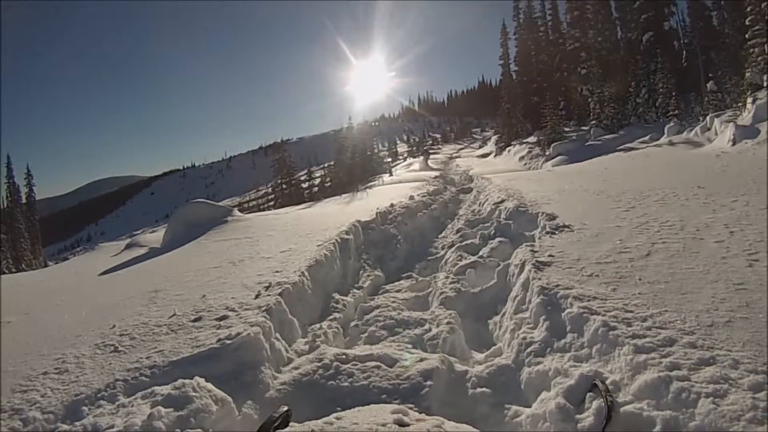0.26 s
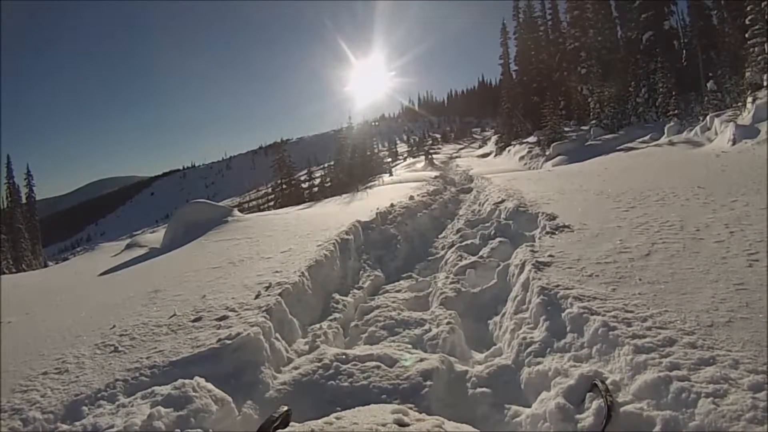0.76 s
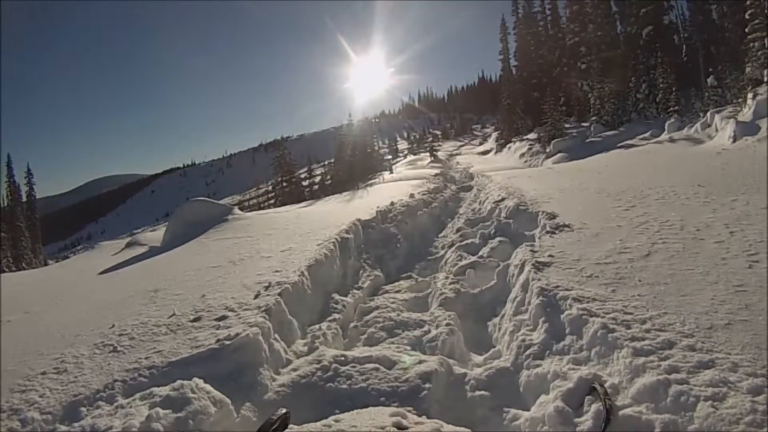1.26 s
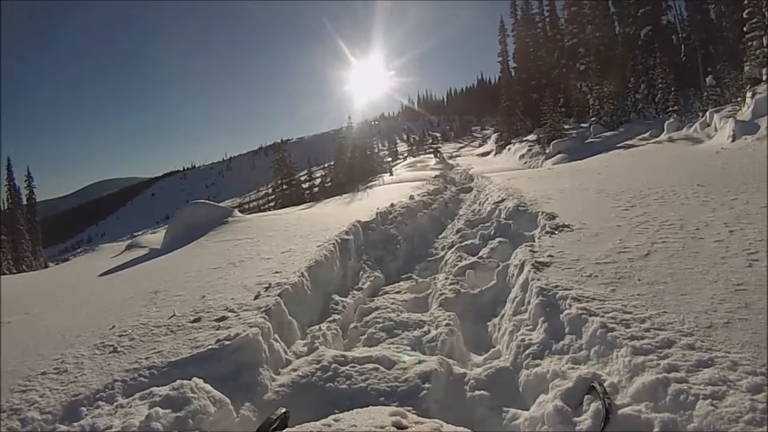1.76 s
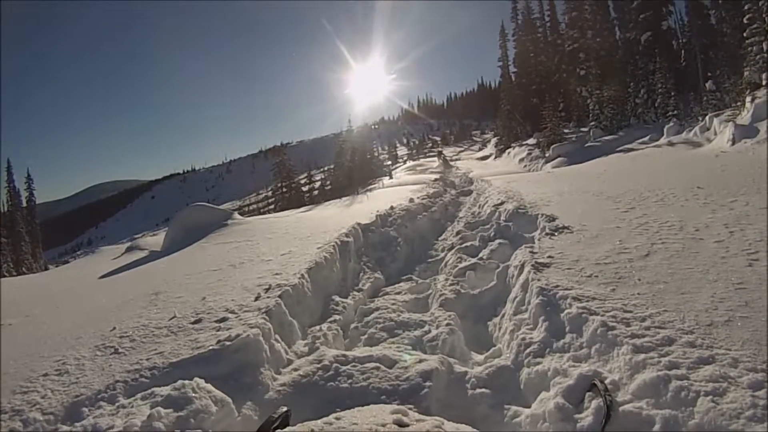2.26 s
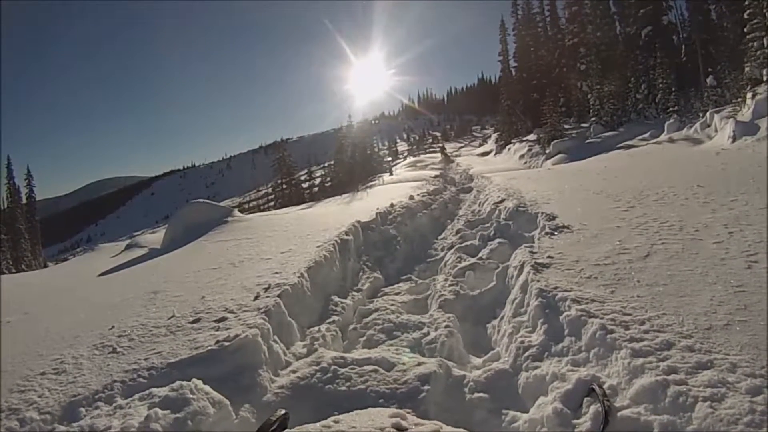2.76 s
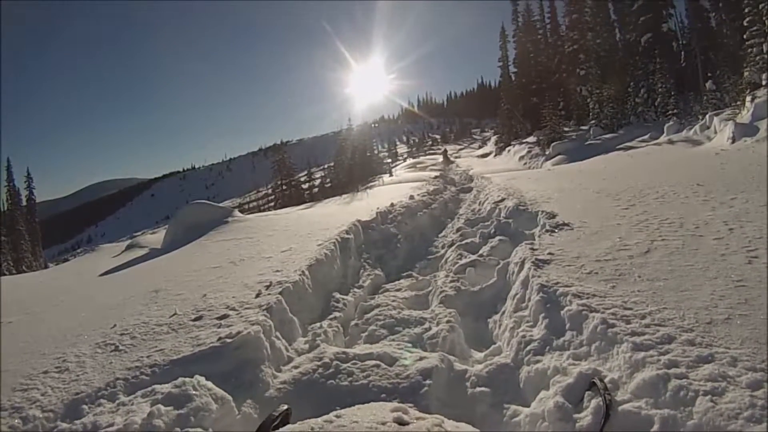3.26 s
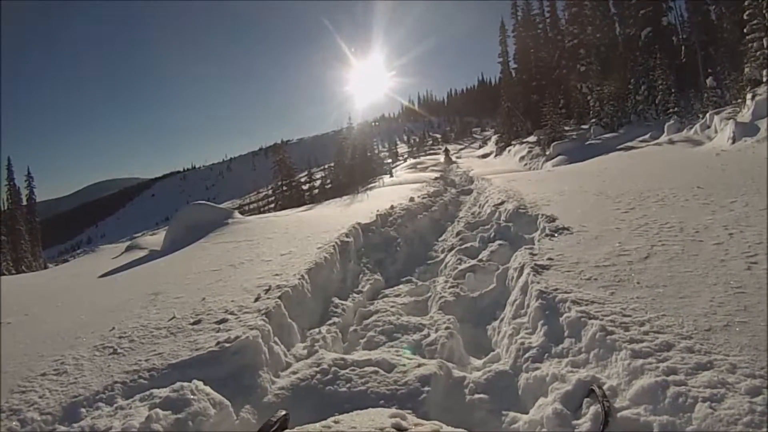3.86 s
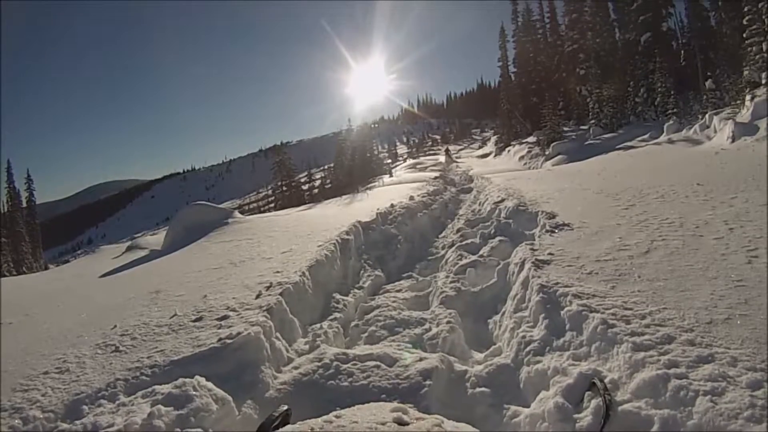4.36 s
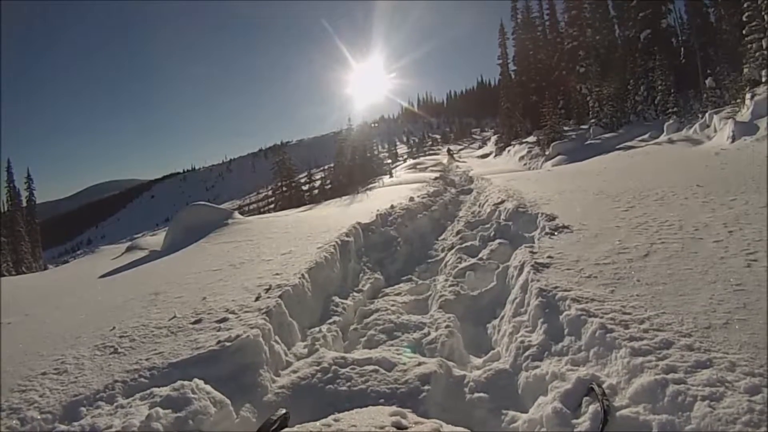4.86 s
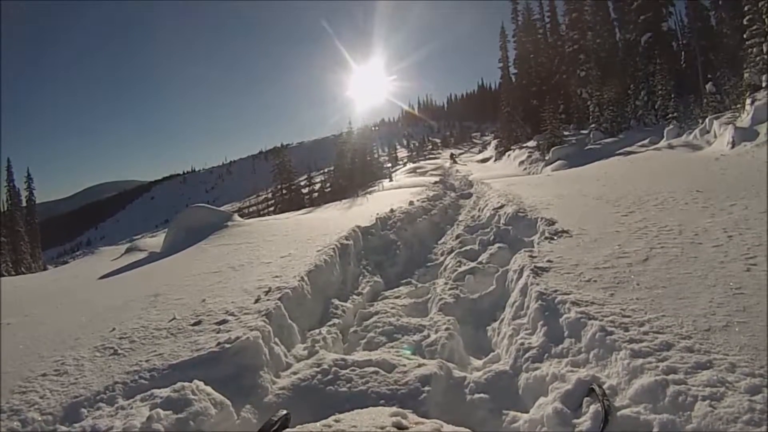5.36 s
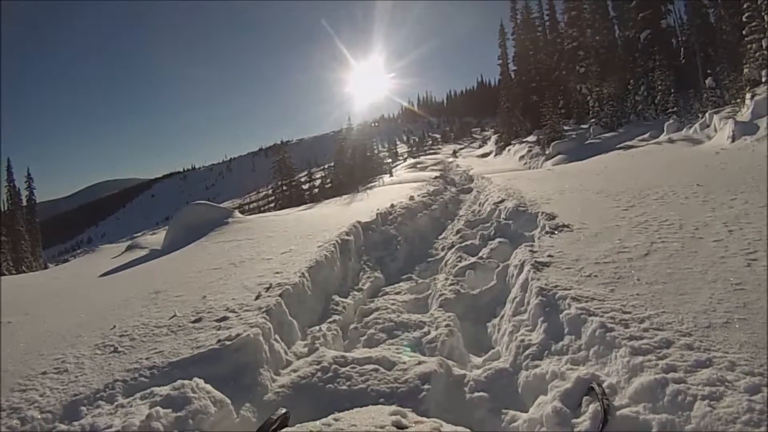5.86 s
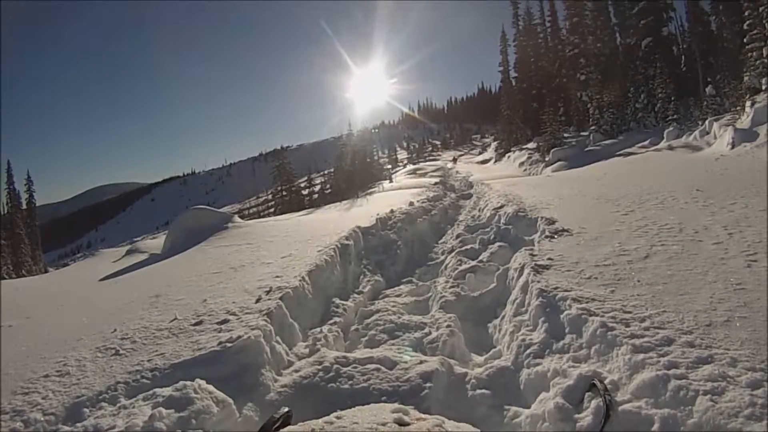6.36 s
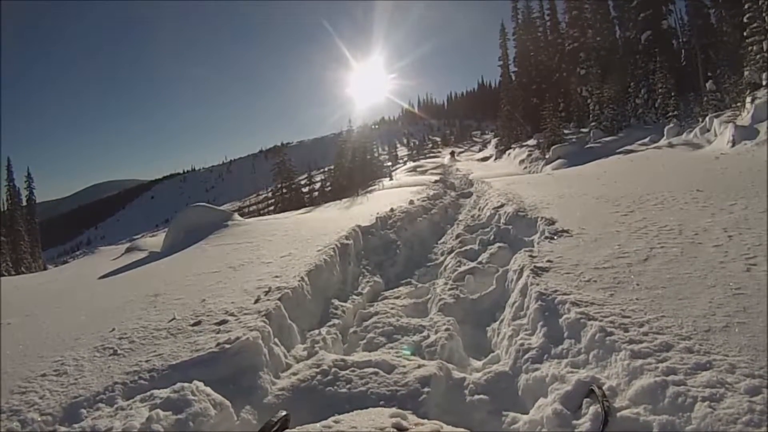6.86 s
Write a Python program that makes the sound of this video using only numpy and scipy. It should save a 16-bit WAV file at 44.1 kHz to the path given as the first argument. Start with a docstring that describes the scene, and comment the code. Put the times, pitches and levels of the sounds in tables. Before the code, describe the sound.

A snowmobile idles with a deep, uneven throb and light rattling, its revs dipping briefly with a soft knocking.

```python
"""In deep snow with no echo around, a two-stroke snowmobile idles, heard from the seat.
Each crank turn pushes a deep throb out of the exhaust, and every few turns a weak firing makes it sag.
Periodic impacts excite resonances: the chassis drums, the pistons clatter under the hood and loose
fittings tick in step with the shaking; when the revs dip, the clutch knocks once a turn.
The bodywork gives dry cracks, and cooling air hisses behind it all."""
import numpy as np
from scipy import signal
from scipy.fft import rfft, irfft
from scipy.ndimage import uniform_filter1d
import sys
import numpy as np
from scipy import signal
from scipy.fft import rfft, irfft
from scipy.io import wavfile
from scipy.ndimage import uniform_filter1d

SR = 44100
rng = np.random.default_rng(int(sys.argv[2]) if len(sys.argv) > 2 else 0)


def store_wav(level_fs):
    """Save 16-bit WAV to argv[1]."""
    pcm = np.round(np.clip(np.atleast_2d(level_fs), -1, 1) * 32767)
    wavfile.write(sys.argv[1], SR, pcm.T.astype(np.int16))


N = 313110
TIME = np.arange(N) / SR


# boom at the firing rate, twice the crank speed: time_s, level_db
BOOM_LEVELS = [(0, -37), (.8, -30.5), (1.2, -35), (1.55, -26.5), (2.2, -24.5), (2.5, -29.5), (3.1, -32),
               (3.55, -36.5), (3.85, -28), (4.35, -35), (4.8, -37.5), (5.5, -33), (7.1, -33.5)]
# pipe drone and muffler burble: time_s, drone_db, burble_db
PIPE_LEVELS = [(0, -53, -34), (.85, -39.5, -34.5), (1.5, -56, -37), (2.4, -50, -37.5), (3.15, -41.5, -38.5),
               (3.7, -49, -40.5), (4.55, -44.5, -36.5), (5.0, -35, -39), (7.1, -35.5, -40.5)]
# muffler hum at four times the crank speed: time_s, level_db
MUFFLER_HUM_LEVELS = [(0, -42), (.4, -46), (.75, -39), (1.15, -40), (1.5, -41), (2.2, -37.5), (2.7, -41),
                      (3.2, -38), (3.6, -45), (4.2, -51), (5.0, -43), (5.9, -50), (7.1, -49)]
# muffler resonances: pitch_hz, bandwidth_hz, gain_db
MUFFLER_MODES = [(83.3, 31.6, -3), (115, 28.7, 1.5), (151.7, 30, -2.5)]

def exhaust(turns, sag_db, firings):
    """Acoustic filtering: the muffler rounds the gas pulses to a near sine with weaker harmonics."""
    boom_db, = curves(BOOM_LEVELS)
    drone_db, burble_db = curves(PIPE_LEVELS)
    hum_db, = curves(MUFFLER_HUM_LEVELS)
    # a weak firing comes softer, later and with more boom
    slip_turns = np.cumsum(.64 * sag_db) / SR
    lag_turns = slip_turns - uniform_filter1d(slip_turns, size=SR // 4, mode="nearest")
    throb = harmonic(turns - lag_turns, 1, -6 - sag_db)
    boom = harmonic(turns - lag_turns / 2, 2, boom_db + .35 * flutter(sag_db) + waver(11))
    drone = harmonic(turns + .5, 3, drone_db - .5 + waver(8))
    drone += harmonic(turns, 6, drone_db - 10 + waver(8)) + harmonic(turns, 9, drone_db - 14)
    late_sag_db = flutter(sag_db, lag_s=.028)
    hum = harmonic(turns, 4, hum_db - late_sag_db)
    burble = steady(band(ring(firings, MUFFLER_MODES), 65, 192)) * undb(burble_db - late_sag_db)
    # uneven burning leaves a low rumble between the tones
    rumble = unit(band(rng.standard_normal(N), 38, 64)) * undb(boom_db)
    return throb + boom + drone + hum + burble + rumble


def cylinder_firings(turns):
    """Impulse excitation: two cylinders fire in alternation, each with a burst of noise."""
    pulses = blows(turns, .88, .015, 1.95) + undb(-1) * blows(turns, .5, .016, 2.9)
    return unit(pulses + undb(10) * chatter(pulses, .012, 7.8)) + undb(-2) * rng.standard_normal(N)


# misfires: centre_s, loss_db, half_length_s
MISFIRE_DIPS = [(.24, 3.8, .04), (.54, 3.4, .04), (1.04, 3.8, .04), (1.23, 5.5, .05), (1.43, 7.4, .15),
                (1.69, 5.8, .09), (1.845, 13.5, .036), (1.995, 6.3, .033), (2.135, 5.5, .033),
                (2.26, 5, .033), (2.4, 4.7, .035), (2.79, 3.4, .07), (3.07, 4.8, .04), (3.36, 3.7, .04),
                (3.63, 7.5, .055), (3.77, 5.2, .045), (4.04, 4.5, .05), (4.41, 4.8, .045), (4.62, 3.2, .3),
                (4.72, 9.5, .055), (5.0, 5.3, .04), (5.47, 6.3, .033), (5.99, 4.2, .04), (6.27, 4.6, .045),
                (6.69, 4.3, .04), (7.02, 3.6, .045)]

def combustion_sag(turns, weak_every_turns=4.3):
    """Amplitude modulation: the throb's loss in dB from misfires and the weak firings between them."""
    misfire_turns = np.interp([s for s, _, _ in MISFIRE_DIPS], TIME, turns)
    edges = np.r_[turns[0] - 2, misfire_turns]
    weak_turns = np.concatenate([np.linspace(a, b, round((b - a) / weak_every_turns) + 1)[1:-1]
                                 for a, b in zip(edges, edges[1:])])
    timing, depth = rng.standard_normal((len(weak_turns), 2)).T
    weak_s = np.interp(weak_turns + .2 * timing, turns, TIME)
    weak_dips = [(s, db, .04) for s, db in zip(weak_s, 2.5 + .5 * depth)]
    loss_db = np.zeros(N)
    for centre_s, db, half_length_s in weak_dips + MISFIRE_DIPS:
        near = np.abs(TIME - centre_s) < 3 * half_length_s
        dip_db = db * np.exp(-((TIME[near] - centre_s) / half_length_s) ** 2)
        loss_db[near] = np.maximum(loss_db[near], dip_db)
    return uniform_filter1d(loss_db, size=SR // 100)


# crankshaft rotation: time_s, speed_hz
CRANK_SPEED = [(0.0, 28.95), (0.25, 28.75), (0.75, 30.58), (1.17, 29.63), (1.31, 27.98), (2.14, 28.2),
               (2.59, 29.68), (2.97, 28.93), (3.45, 29.51), (3.57, 28.56), (4.12, 29.44), (4.7, 28.33),
               (5.44, 28.64), (5.77, 29.59), (6.41, 28.97), (6.77, 29.51), (7.1, 28.56)]

def crank():
    """Rotational inertia: the flywheel keeps the crank angle, in turns, advancing smoothly."""
    speed_hz, = curves(CRANK_SPEED)
    return .37 + np.cumsum(speed_hz) / SR


def labour(smooth_hz=29.2, labouring_hz=28.1, lag_s=.1):
    """First-order lag: effort builds from 0 at smooth idle to about 1 when the revs dip."""
    speed_hz, = curves(CRANK_SPEED)
    strain = np.maximum((smooth_hz - speed_hz) / (smooth_hz - labouring_hz), 0)
    keep = np.exp(-1 / (lag_s * SR))
    return signal.lfilter([1 - keep], [1, -keep], strain, zi=[keep * strain[0]])[0]


# chassis resonances: pitch_hz, bandwidth_hz, gain_db
CHASSIS_MODES = [(207.7, 17.6, -2.5), (251, 30.3, -0.5), (297.6, 43.5, -1.5), (383.4, 39.5, -6),
                 (484, 101, -15)]
# chassis drumming: time_s, relative_db
DRUMMING_LEVELS = [(0, -36), (.5, -40.5), (1.2, -40.5), (1.55, -36.5), (1.75, -37.5), (2.2, -35.5),
                   (2.5, -39.5), (3.45, -42), (3.7, -38.5), (4.4, -40.5), (4.9, -36.5), (5.3, -35.5),
                   (5.6, -39.5), (7.1, -39.5)]
# chassis hum, relative to the drumming: crank_multiple, relative_db
HUM_HARMONICS = [(5, -8.5), (7, -13), (10, -13), (11, -16), (12, -20), (14, -17)]
# hum at eight times the crank speed, where the chassis resonates: time_s, relative_db
RESONANT_HUM_LEVELS = [(0, -37), (.4, -46), (.7, -42), (1.0, -41), (1.15, -48), (1.45, -38.5),
                       (1.85, -36.5), (2.3, -37.5), (2.52, -53), (2.67, -40.5), (2.95, -45), (3.1, -38.5),
                       (3.5, -48), (3.8, -37), (4.0, -41), (4.3, -40), (4.57, -48), (4.75, -38.5),
                       (5.3, -36), (5.6, -47), (7.1, -45)]

def chassis(turns, firings):
    """Forced vibration: the shaken chassis drums in its modes and hums at crank harmonics."""
    drum_db, = curves(DRUMMING_LEVELS)
    resonant_db, = curves(RESONANT_HUM_LEVELS)
    drumming = steady(band(ring(firings, CHASSIS_MODES), 159.7, 747)) * undb(drum_db + 1.5)
    hum = sum(harmonic(turns, order, drum_db + db + 2.6 * waver(3.8)) for order, db in HUM_HARMONICS)
    resonant_hum = harmonic(turns + .005 * waver(12), 8, resonant_db - 1.5 + 1.6 * waver(13))
    return drumming + hum + resonant_hum


# hood and engine case resonances: pitch_hz, bandwidth_hz, gain_db
HOOD_MODES = [(637, 59, -4.5), (846, 80, -9), (1526, 146, 1), (1732, 60, 1.5), (1870, 150, -7),
              (2100, 150, -7.5)]
CASE_MODES = [(1082, 52, -5), (1408, 46.4, 7), (2457, 99, -11.5), (2747, 150, -18.5), (3333, 280, -16.5)]
# engine clatter: time_s, relative_db
CLATTER_LEVELS = [(0, -39), (.4, -41.5), (1.2, -41.5), (1.4, -39.5), (1.7, -39.5), (2.0, -37.5),
                  (2.25, -38.5), (2.45, -41), (3.5, -42), (3.8, -41.5), (4.6, -41.5), (5.1, -38.5),
                  (5.6, -41), (5.95, -43.5), (6.2, -41.5), (7.1, -42)]

def piston_clatter(turns, effort):
    """Modal ringing: one piston's slap excites mainly the hood, the other's mainly the engine case."""
    def with_bearing_whirr(slaps):
        impacts = unit(undb(-16) * slaps + chatter(slaps, .011, 2))
        return impacts + undb(-1.5) * rng.standard_normal(N)

    level_db, = curves(CLATTER_LEVELS)
    late_turns = turns - .1 * effort  # the slaps come later as the engine labours
    first, second = blows(late_turns, .18, .022, 1.5), blows(late_turns, .52, .03, 1.5)
    hood = ring(with_bearing_whirr(first + undb(-5) * second), HOOD_MODES)
    case = ring(with_bearing_whirr(second + undb(-7) * first), CASE_MODES)
    return steady(band(hood + case, 520, 4000)) * undb(level_db - 1.9)


# clutch knock, hardest around the dips in revs: time_s, relative_force_db, angle_turns
KNOCKS = [(0, -57.5, .68), (1.15, -56, .67), (1.31, -52, .71), (1.41, -47.5, .695), (1.65, -47.3, .705),
          (1.79, -46, .77), (1.98, -47, .79), (2.06, -47.5, .75), (2.22, -46.5, .765), (2.4, -55.5, .78),
          (3.6, -54.5, .75), (3.87, -50, .8), (4.2, -58, .75), (4.85, -51.5, .84), (5.2, -50, .82),
          (5.7, -55.5, .8), (7.1, -56, .81)]
# resonances of the clutch weights and housing: pitch_hz, bandwidth_hz, gain_db
WEIGHT_MODES = [(1260, 270, 2), (1800, 480, 9.5), (2206, 590, 3.5), (3260, 290, -33.5)]
HOUSING_MODES = [(396, 220, -3.5), (508, 82, 6), (814.5, 52, 3.5)]
# drift of the housing's ring: time_s, shift_hz
HOUSING_DRIFT = [(1.35, 12), (1.8, -20), (2.25, 13), (3.8, 35), (5.2, 34)]

def clutch(turns, housing_lag_s=.003):
    """Backlash: slack in the clutch closes once a turn; the weights clack, then the housing rings."""
    force_db, angle_turns = curves(KNOCKS)
    shift_hz, = curves(HOUSING_DRIFT)
    knocks = blows(turns - angle_turns, 0, .006, .9)
    impact_db = np.minimum(force_db + 46, 0)  # the weights hit no harder once their slack is used up
    weights = ring(knocks + undb(-8) * chatter(knocks, .002, 3), WEIGHT_MODES)
    push = np.roll(knocks + undb(-10) * chatter(knocks, .007, 3), int(housing_lag_s * SR))
    housing = drifting_ring(push, HOUSING_MODES, shift_hz)
    # light knocks are dull: the clack weakens more steeply than the ring
    clack = steady(band(weights, 1350, 3100)) * undb(2.2 * impact_db - 44)
    return clack + steady(band(housing, 330, 1050)) * undb(1.3 * impact_db - 42)


# spectrum of the metal fittings: frequency_hz, gain_db
FITTING_SPECTRUM = [(1500, -28), (3300, -4), (4000, -11.5), (4750, 2), (5500, -3.5), (6300, 2), (6900, -1),
                    (7600, 6), (8700, -5), (10500, -7.5), (12400, -0.5), (13600, -14), (15000, -25.5)]
# their rattle: time_s, relative_db
RATTLE_LEVELS = [(0, -61), (.45, -66), (.7, -60.5), (1.35, -67.5), (1.9, -65.5), (2.5, -63), (3.0, -64),
                 (3.25, -63), (3.6, -66.5), (3.9, -61.5), (4.4, -66.5), (5.0, -66), (5.4, -62.5),
                 (5.75, -60.5), (6.1, -64), (6.45, -62), (7.1, -63)]
# their single sharp ticks: start_s, level_db
FITTING_TICKS = [(0.3252, -33), (0.497, -36), (0.629, -35), (0.731, -43), (0.7485, -29.5), (0.780, -32),
                 (0.794, -40), (1.1267, -40), (1.1605, -40), (1.1945, -38), (1.482, -37), (1.941, -37),
                 (2.082, -42), (2.2248, -35), (2.2852, -37), (2.4338, -35), (2.4652, -32), (2.669, -37.5),
                 (2.769, -34), (3.2529, -34), (3.8393, -44), (3.8732, -39), (5.055, -32), (5.0843, -40),
                 (5.293, -35), (5.4008, -34), (5.4333, -37), (5.5087, -39), (5.5735, -41), (5.6635, -33),
                 (5.7471, -39), (5.768, -39)]

def loose_fittings(turns, sag_db):
    """Contact rattle: parts are thrown once a turn, bounce twice and fall back lightly in between."""
    level_db, = curves(RATTLE_LEVELS)
    hits = blows(turns, .68, .035, 2.6) + blows(turns, .78, .02, 2.6)
    hits += undb(-7) * blows(turns, .85, .04, 2.6)
    falls = undb(-4) * blows(turns, .25, .015, 3) + undb(-8) * blows(turns, .37, .03, 3)
    falls += undb(-7) * blows(turns, .52, .03, 3)
    contacts = undb(-3) * (hits + falls) + chatter(hits + falls, .0006, 5)
    rattle = steady(colour(contacts, FITTING_SPECTRUM)) * undb(level_db - .5 - 2.1 * flutter(sag_db))
    return rattle + strikes(FITTING_TICKS, FITTING_SPECTRUM, spray_db=-3, decay_s=.002)


# spectrum of the bodywork: frequency_hz, gain_db
BODYWORK_SPECTRUM = [(250, -10), (700, 10), (1300, 11), (2500, 16), (3400, 14.5), (6000, 10), (8000, 5),
                     (10000, -4), (15000, -22)]
# its cracks: start_s, level_db
BODYWORK_CRACKS = [(.3335, -39), (.3397, -37), (.4697, -36), (.4765, -37), (.6053, -38), (.611, -32),
                   (.619, -33), (.6378, -38), (.647, -32), (.8018, -34), (.8075, -37), (.812, -30),
                   (.9018, -33), (.9065, -34), (.9342, -33), (.9451, -33), (.9687, -33), (.973, -34),
                   (1.1029, -31), (1.1071, -38), (1.1411, -36), (3.2267, -39), (3.2323, -35), (3.2506, -34),
                   (3.2607, -31), (3.2777, -36), (3.3105, -39), (3.3984, -32), (3.402, -36), (3.4297, -37),
                   (3.4474, -32), (5.7881, -32), (6.610, -30)]

def bodywork():
    """Broadband transients: brief impulses sound as dry cracks, as of cold plastic."""
    return strikes(BODYWORK_CRACKS, BODYWORK_SPECTRUM, spray_db=-6, decay_s=.005)


# spectrum of the cooling air: frequency_hz, gain_db
AIR_SPECTRUM = [(60, -2), (400, 3), (1000, 3.5), (2500, 1), (3400, -2), (4000, -5), (4750, -1), (5500, -7),
                (7500, -9.5), (9000, -16), (12000, -15.5), (15000, -32)]
# its level against effort: idle_db, full_labour_rise_db, exponent
AIR_LEVEL_LAW = (-55.5, 2.8, 0.69)

def cooling_air(turns, effort, sag_db):
    """Flow noise: air hisses through the engine bay, pulsing lightly with the crank."""
    idle_db, rise_db, exponent = AIR_LEVEL_LAW
    level_db = idle_db + rise_db * effort ** exponent - .55 * flutter(sag_db)
    pulse_db = 2 * np.cos(2 * np.pi * (turns - .8))
    return unit(colour(rng.standard_normal(N), AIR_SPECTRUM)) * undb(level_db + pulse_db)


def harmonic(turns, order, db):
    """Harmonic motion at a whole multiple of the crank speed, at an rms level."""
    return np.sqrt(2) * undb(db) * np.cos(2 * np.pi * order * turns)


def blows(turns, angle_turns, jitter_turns, scatter_db):
    """Quasi-periodic impulses: one a turn near a crank angle, each with its own timing and force."""
    whole_turns = np.arange(int(turns[-1]) + 1)
    timing, force = rng.standard_normal((len(whole_turns), 2)).T
    at = np.searchsorted(turns, whole_turns + angle_turns + jitter_turns * timing)
    inside = (at > 0) & (at < N)
    return np.bincount(at[inside], undb(scatter_db * np.clip(force[inside], -2, 2)), N)


def chatter(hits, decay_s, grain_db):
    """Exponential decay: each blow dies away in a spray of tiny contacts with the same energy."""
    keep = np.exp(-2 / (decay_s * SR))
    energy = signal.lfilter([1 - keep], [1, -keep], hits ** 2 + 1e-18)
    grains = rng.standard_normal(N) * undb(grain_db * np.clip(rng.standard_normal(N), -3, 3))
    return np.sqrt(energy) * unit(grains)


def strikes(table, spectrum, spray_db, decay_s):
    """Source and filter: single contacts, each with a short spray, shaped by a spectrum."""
    start_s, level_db = np.transpose(table)
    hits = np.bincount((start_s * SR).astype(int), undb(level_db), N)
    return colour(hits + undb(spray_db) * chatter(hits, decay_s, 3.3), spectrum)


def ring(x, modes):
    """Modal superposition: neighbouring resonances swing in opposite directions."""
    return sum((-1) ** k * undb(db) * signal.lfilter(*signal.iirpeak(hz, hz / width, fs=SR), x)
               for k, (hz, width, db) in enumerate(modes))


def drifting_ring(x, modes, shift_hz):
    """Heterodyning: a rotating phasor moves every resonance by shift_hz."""
    phasor = np.exp(2j * np.pi * np.cumsum(shift_hz) / SR)
    return (ring(signal.hilbert(x) / phasor, modes) * phasor).real


def colour(x, spectrum, size=512):
    """Convolution with the minimum-phase impulse response of a spectrum, scaled to peak 1."""
    hz, db = np.transpose(spectrum)
    bins_hz = np.maximum(np.arange(size // 2 + 1) * SR / size, 1)
    cepstrum = irfft(np.log(undb(np.interp(np.log(bins_hz), np.log(hz), db))))
    cepstrum[1:size // 2] *= 2
    cepstrum[size // 2 + 1:] = 0
    response = irfft(np.exp(rfft(cepstrum)))
    return signal.fftconvolve(x, response / np.abs(response).max())[:N]


def band(x, lo_hz, hi_hz):
    """Steep band-pass filtering."""
    return signal.sosfilt(signal.butter(3, [lo_hz, hi_hz], "band", fs=SR, output="sos"), x)


def flutter(sag_db, lag_s=0):
    """Detrending: the quick part of the sag in dB, felt lag_s later."""
    quick_db = np.clip(sag_db - uniform_filter1d(sag_db, size=SR // 3), -3, 3)
    return np.interp(TIME - lag_s, TIME, quick_db)


def waver(rate_hz):
    """Slow random modulation with rms 1."""
    step = int(SR / rate_hz)
    held = np.repeat(rng.standard_normal(N // step + 1), step)
    return unit(uniform_filter1d(uniform_filter1d(held, step), step)[:N])


def curves(table):
    """Linear interpolation of a table's columns in time."""
    time_s, *columns = np.transpose(table)
    return [np.interp(TIME, time_s, column) for column in columns]


def steady(x):
    """Running normalisation to rms 1 over a third of a second."""
    return x / np.sqrt(uniform_filter1d(x ** 2, size=SR // 3) + 1e-12)


def unit(x):
    """Normalisation to rms 1."""
    return x / np.sqrt(np.mean(x ** 2))


def undb(db):
    """Decibels to amplitude ratio."""
    return 10 ** (np.asarray(db) / 20)


def scene():
    """Superposition: the sources add in mono, their rhythms locked to one crankshaft."""
    turns, effort = crank(), labour()
    sag_db = combustion_sag(turns)
    firings = cylinder_firings(turns)
    engine = exhaust(turns, sag_db, firings) + piston_clatter(turns, effort) + clutch(turns)
    body = chassis(turns, firings) + loose_fittings(turns, sag_db) + bodywork()
    return (engine + body + cooling_air(turns, effort, sag_db))[None]


def record(dry, cutoff_hz=15300):
    """Band limiting: a steep low-pass removes the highest treble."""
    return signal.sosfilt(signal.ellip(8, .2, 70, cutoff_hz, fs=SR, output="sos"), dry)


dry = scene()
out = record(dry)
store_wav(out)
```